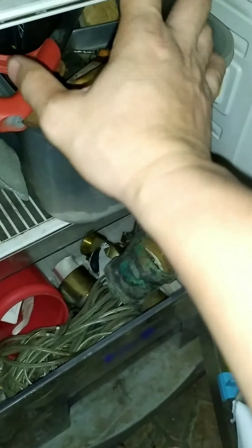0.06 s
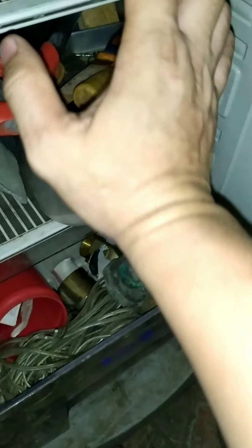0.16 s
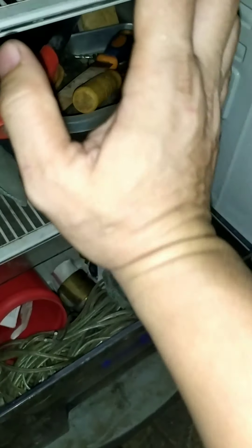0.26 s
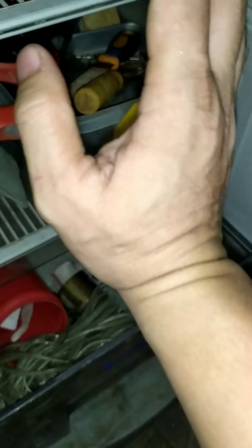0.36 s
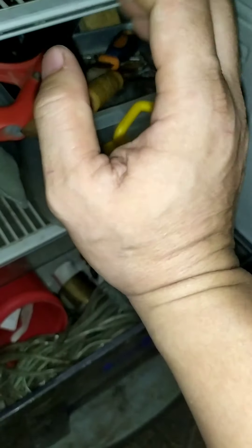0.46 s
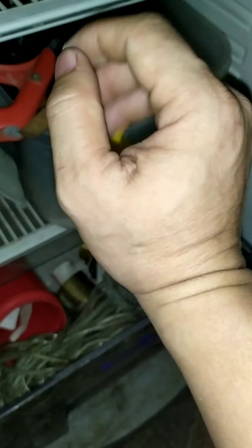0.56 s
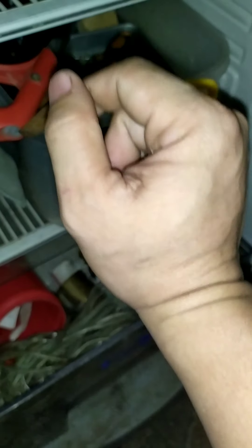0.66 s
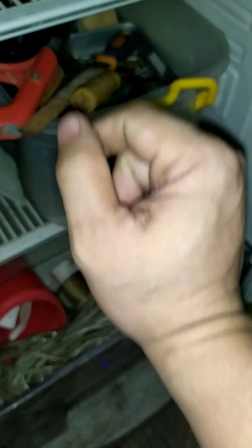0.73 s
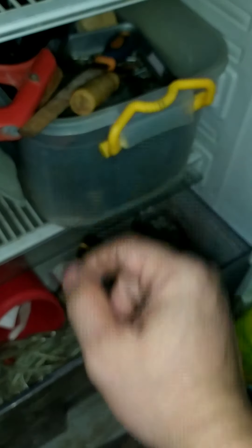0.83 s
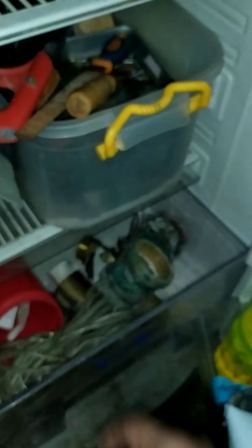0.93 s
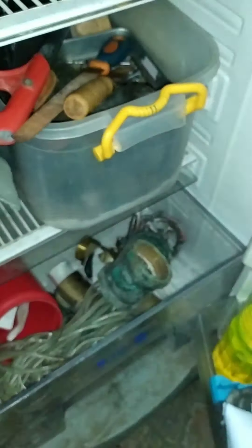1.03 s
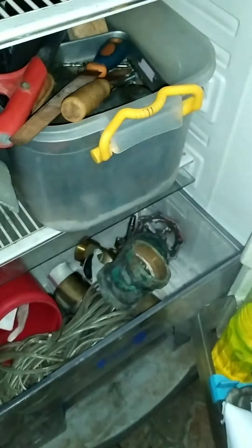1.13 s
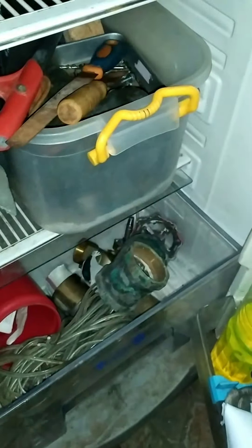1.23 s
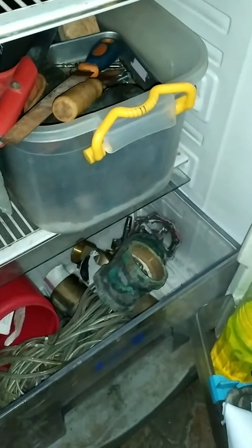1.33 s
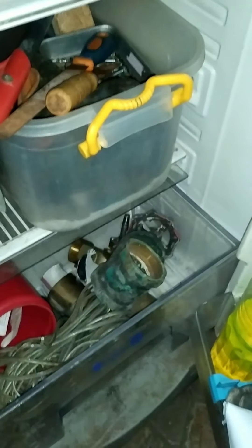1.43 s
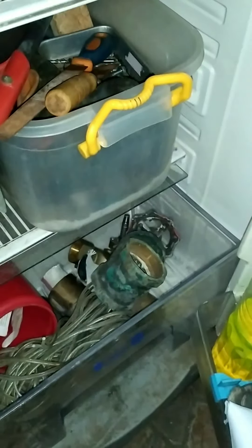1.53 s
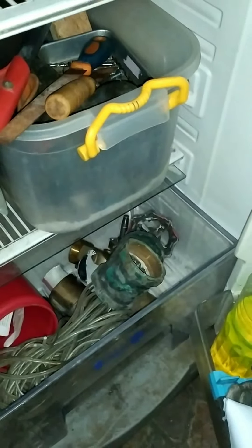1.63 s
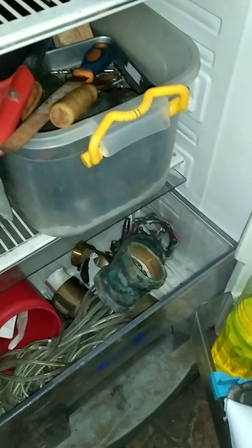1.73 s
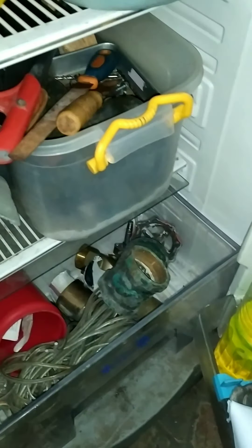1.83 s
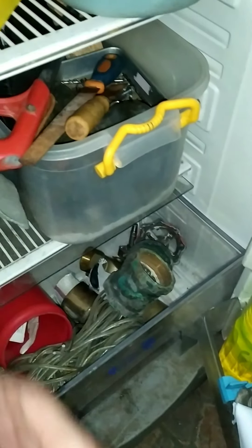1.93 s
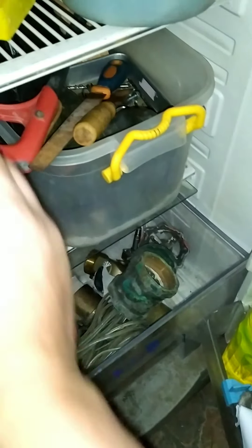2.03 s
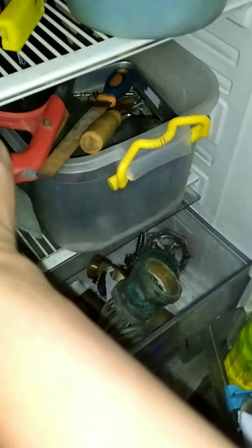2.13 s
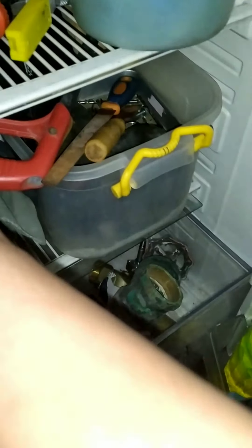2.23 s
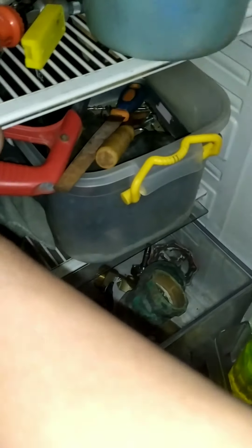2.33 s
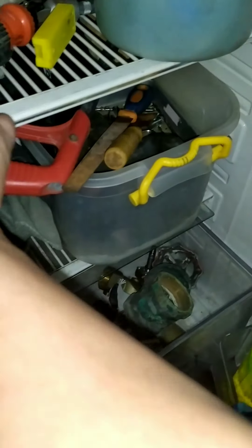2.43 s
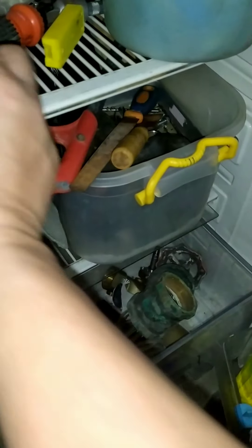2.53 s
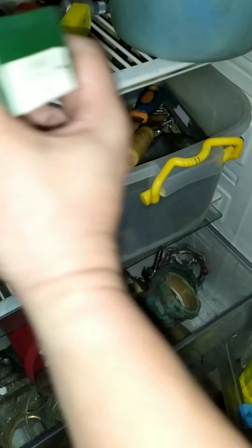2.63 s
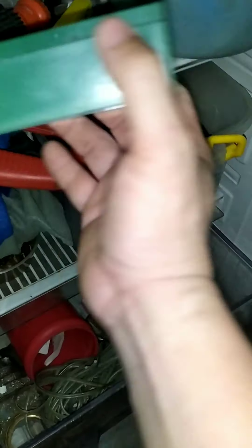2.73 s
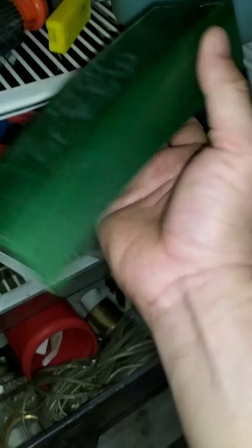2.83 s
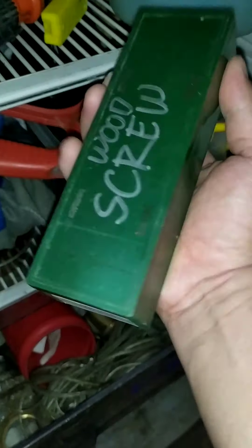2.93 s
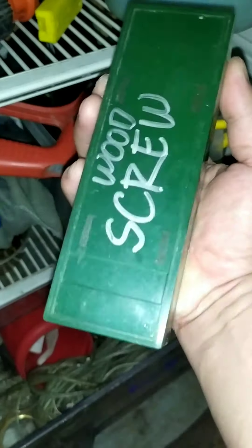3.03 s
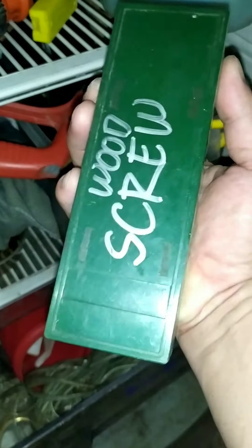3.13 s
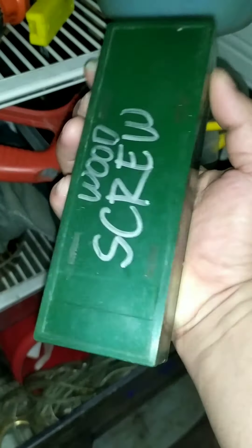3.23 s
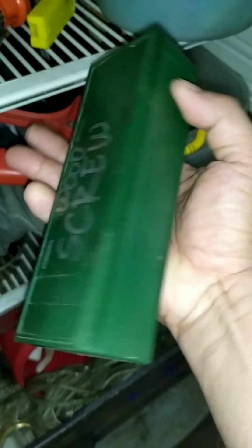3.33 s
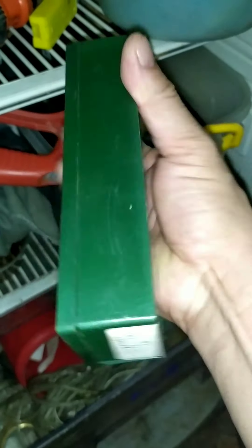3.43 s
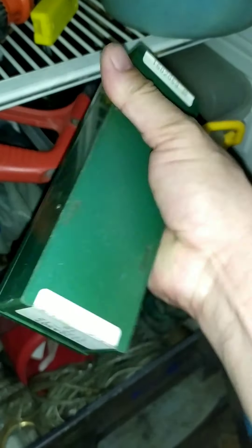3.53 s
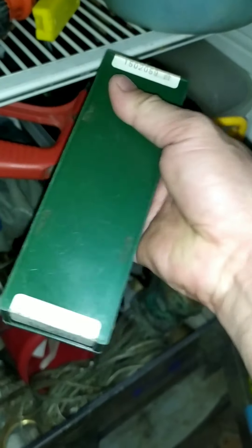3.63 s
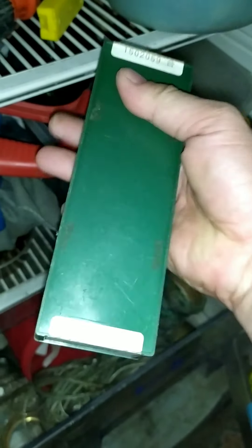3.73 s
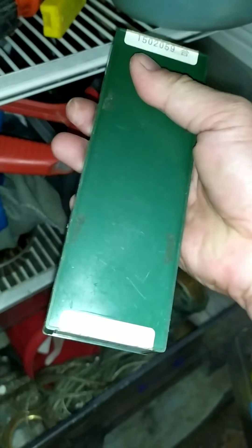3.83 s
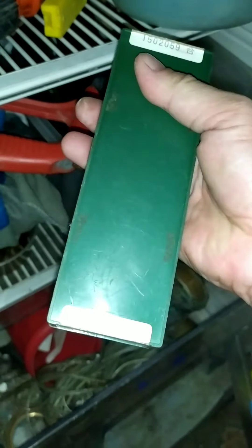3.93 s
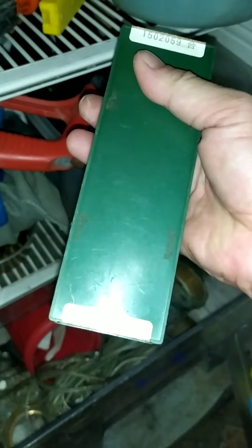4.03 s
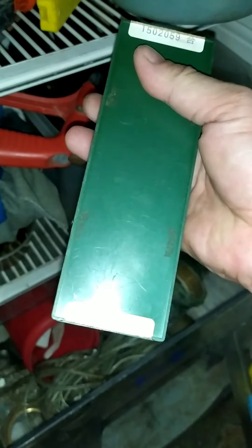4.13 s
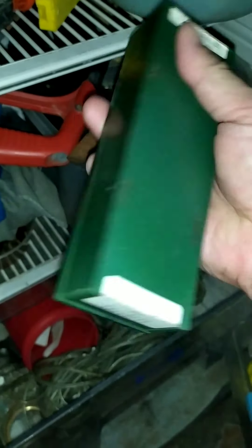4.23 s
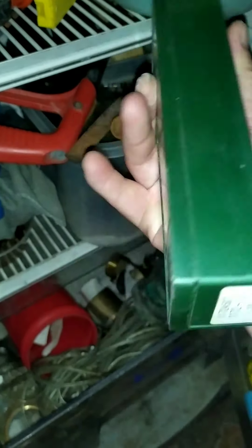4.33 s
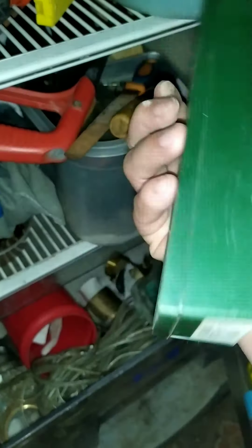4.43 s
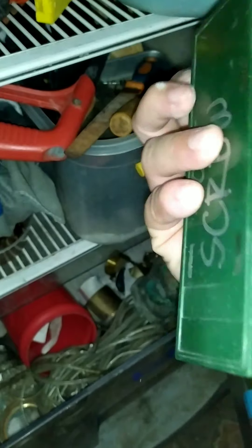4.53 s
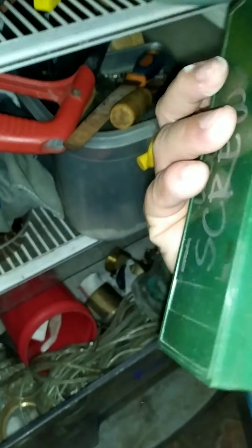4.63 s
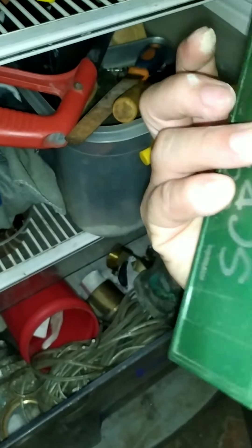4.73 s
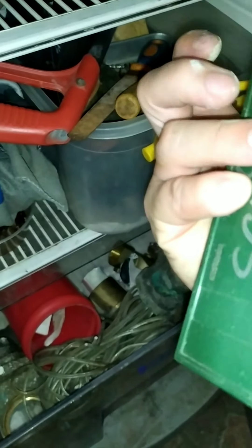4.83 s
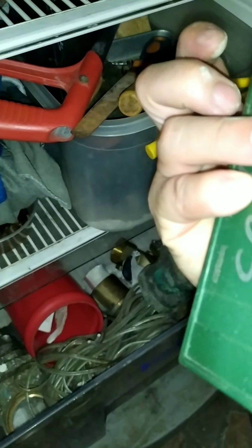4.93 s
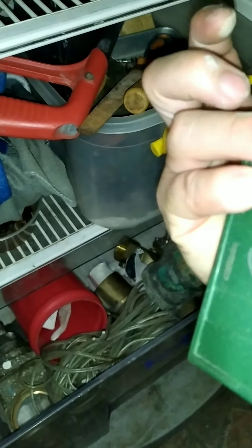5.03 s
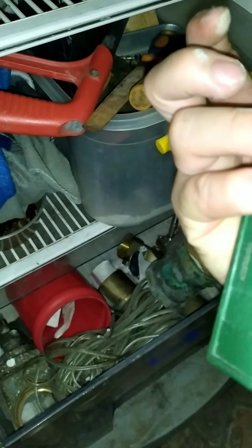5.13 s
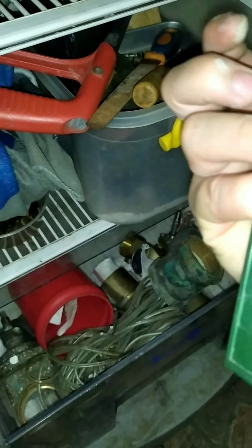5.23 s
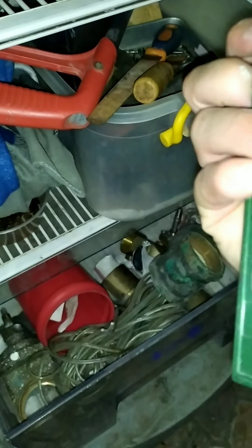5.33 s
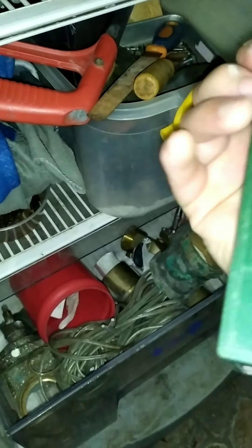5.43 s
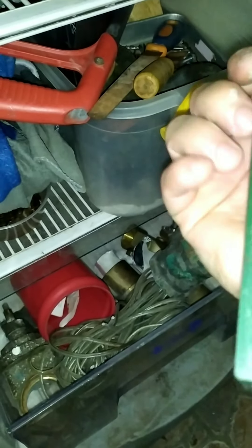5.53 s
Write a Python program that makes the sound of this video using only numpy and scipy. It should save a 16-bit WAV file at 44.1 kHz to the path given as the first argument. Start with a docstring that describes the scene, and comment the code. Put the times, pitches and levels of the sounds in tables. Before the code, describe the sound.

A cricket chirps over faint night rumble as a tool clatters in a tub and a box of screws is lifted, tipped and shaken.

```python
"""A tool knocks about in a plastic tub with loose metal bits, and stirs again faintly after a second;
a hand then drags a long plastic box of screws off a wire shelf and tips it, so screws slide and clack.
A cricket chirps outside over a low night rumble throughout. Knocks, box and shelf ring decaying modes;
slides are random collisions, chirps are falling tones and the night is shaped noise."""
import sys
import numpy as np
from scipy import signal
from scipy.io import wavfile
from scipy.ndimage import uniform_filter1d

SR = 44100
rng = np.random.default_rng(int(sys.argv[2]) if len(sys.argv) > 2 else 0)


def int16_out(signal):
    """Quantize to a 16-bit WAV file."""
    q = np.round(np.clip(np.atleast_2d(signal).T, -1, 1) * 32767)
    wavfile.write(sys.argv[1], SR, q.astype(np.int16))


N = 246078

# Night spectrum: (frequency [Hz], relative density [dB per Hz])
NIGHT_SPECTRUM = [(15, -31), (25, -8), (102, 1), (161, -13.5), (343, -12), (1040, -22.5), (1400, -26),
                  (5840, -32.5), (6680, -28.5), (7650, -9), (8300, -25.5), (9500, -65), (10900, -37),
                  (14600, -32.5), (15900, -44.5)]
# Night stereo: (frequency [Hz], left-right correlation [-1..1])
NIGHT_CORRELATION = [(60, 0.94), (240, 0.93), (950, 0.087), (3770, 0.068), (15000, 0.13)]
# Last and loudest wing stroke of each chirp: time [s]
CHIRP_TIMES_S = [0.0452, 0.383, 0.485, 0.5853, 0.6834, 0.778, 0.877, 0.975, 1.074, 1.1734, 1.269, 1.381,
                 1.4826, 1.5908, 1.6923, 1.7918, 1.8882, 1.9846, 2.0815, 2.1768, 2.2795, 2.379, 2.4723,
                 2.571, 3.1543, 3.2488, 3.348, 3.936, 4.029, 4.1233, 4.2227, 4.32, 5.001, 5.0975, 5.1948,
                 5.2965, 5.3916]
# Chirp loudness, before stroke levels: (time [s], level [dB])
CHIRP_LEVELS = [(0, -42.5), (.85, -42.5), (1.5, -40), (2.2, -39.5), (2.3, -45), (3.3, -43.5), (4.3, -45),
                (5.1, -41), (5.3, -40.5), (5.4, -46)]
# Wing strokes of one chirp: (time from the last stroke [s], level re chirp [dB])
WING_STROKES = [(-.030, -24.5), (-.016, 4), (0, 7.5)]
# Wire rack: (mode [Hz], level [dB], t60 [s])
SHELF_MODES = [(116, -1, 0.17), (126, -11.5, 0.15), (330, -8.5, 0.032), (515, -3.5, 0.046),
               (593, -10, 0.058)]
# The box jolts along the rack, then leaves it: (time [s], hum level [dB], rod clank re hum [dB])
SHELF_JOLTS = [(2.331, -46, -13), (2.39, -38, -18.5), (2.465, -36.5, -15), (2.481, -34, -30),
               (2.562, -34, -21), (2.597, -37.5, -1), (2.7, -43, -4), (2.742, -32, 14.5),
               (2.751, -18.5, -3), (2.797, -27.5, -14), (2.856, -40, -1)]
# Plastic tub: (nominal mode [Hz], mean level [dB], t60 [s])
TUB_MODES = [(114, -4.5, 0.16), (257.6, 5, 0.11), (186, -3, 0.058), (386, -2.5, 0.02), (612.4, -3.5, 0.057),
             (1449, -10.5, 0.015), (2725, -8, .02), (3620, -1.5, 0.013), (3870, -4, 0.02),
             (3960, 1.5, .024), (4710, -7, .018), (6274, -7, 0.03)]
# Tool on tub, before layer trims: (time [s], level [dB], treble re level [dB], thump re level [dB])
TUB_KNOCKS = [(0.087, -3, -10, -11), (0.1272, -10.5, -13.5, -2), (0.1746, -6.5, -10.5, -13.5),
              (0.2257, -13, -5.5, -12), (0.2399, -17, -3, -11.5), (0.2902, -25, -6.5, -24),
              (0.421, -43.5, -9.5, -21), (1.274, -50.5, -25, 5), (1.2896, -57, -3, -6),
              (1.3114, -59, 11, -9)]
# Loose metal slides as one heap (bits in the tub until 1.4 s, then the screws), before trims:
# (start [s], build-up [s], level [dB], slide [s], sag [dB], treble re level [dB], box boom re level [dB])
HEAP_SLIDES = [(0.082, 0.0033, -23, 0.06, -16, -3, -4), (0.2, 0.039, -30, 0.055, -11, 0, -14.5),
               (1.268, .006, -48, 0.092, -20, -1.5, -6), (2.459, 0.081, -42.5, 0.18, 4.5, -6.5, -12),
               (2.78, 0.02, -45, .15, 0.5, -13.5, -11), (2.736, 0.011, -28, 0.035, -18.5, -6.5, -7),
               (2.951, 0.013, -21.5, .025, -3.5, -6.5, -15), (2.991, .012, -21.5, 0.037, -4, -10, -18),
               (3.06, 0.009, -38.5, 0.064, 0.5, -15, -15.5), (3.351, 0.03, -38, 0.19, 5.5, -16, -14),
               (3.472, 0.015, -14, .05, -3.5, -3.5, -9), (3.535, .01, -14.5, .08, -8, -8.5, -20.5),
               (3.624, 0.0097, -17, .19, -17, -5, -12.5), (3.819, 0.014, -33, .14, -28, -13.5, -16),
               (4.352, 0.042, -22, 0.11, -3.5, -10, -14), (4.52, 0.01, -21, 0.18, -9, -9.5, -19.5),
               (4.69, 0.034, -18, 0.042, -10.5, -7.5, -13.5), (4.8, .02, -47, 0.11, -8.5, -9, -19.5),
               (5.36, 0.027, -63, 0.082, 6, -3.5, -6), (5.477, 0.0047, -37.5, 0.053, -3.5, -25, -13.5),
               (5.558, 0.026, -23, .01, -1, -13, -7)]
# Single clacks of screws on the box wall, before trims: (time [s], level [dB], ping [Hz])
SCREW_CLACKS = [(2.382, -41.5, 1850), (2.4024, -38, 2170), (2.6338, -24, 1730), (2.651, -22, 1750),
                (2.705, -26.5, 2500), (2.7433, -15, 2740), (2.825, -30, 1910), (2.8544, -17, 3870),
                (2.8843, -23.5, 4040), (2.9285, -26.5, 2480), (2.9656, -3.5, 4420), (2.9734, -6, 4190),
                (3.0189, -10.5, 2160), (3.0524, -13.5, 2000), (3.2162, -33.5, 3740), (3.239, -40, 2080),
                (3.381, -29, 2020), (3.4118, -17.5, 1980), (3.49, -5, 2220), (3.5125, -8.5, 1250),
                (3.5426, -5.5, 4740), (3.5514, -2.5, 1420), (3.5633, -1.5, 1575), (3.6315, -7, 5540),
                (3.6431, -7.5, 2430), (3.7053, -9, 2420), (3.722, -8.5, 2470), (3.7436, -13, 2460),
                (3.7644, -11.5, 2360), (3.7766, -15, 2740), (3.803, -18, 2740), (3.816, -16.5, 2700),
                (3.967, -37.5, 2480), (4.334, -33, 2790), (4.369, -16.5, 2220), (4.425, -5, 2060),
                (4.4392, -4.5, 4080), (4.467, -8.5, 2090), (4.4844, -7.5, 1960), (4.5236, -6.5, 4820),
                (4.538, -8.5, 1550), (4.5584, -7.5, 4470), (4.5724, -11.5, 4580), (4.6325, -11, 2130),
                (4.6986, -5.5, 4270), (4.7722, -16.5, 1840), (4.838, -24, 2100), (4.8484, -21, 2480),
                (4.8698, -27, 2600), (4.8859, -14.5, 2790), (5.3682, -39.5, 1960), (5.4156, -34, 2200),
                (5.4753, -27, 2420), (5.4847, -15, 1910), (5.5204, -21, 2140), (5.5754, -12, 1940)]
# Tones of a clack: (multiple of its ping [ratio], level [dB])
CLACK_TONES = [(.68, -7.5), (1, 1), (1.43, -6), (2.1, -11)]
# Colour of a screw on the box wall: (frequency [Hz], relative density [dB per Hz])
BOX_COLOUR = [(88, -51.5), (150, -19.5), (259, -11), (465, -11), (599, -5.5), (1010, -11), (1500, -8),
              (1680, -10), (2170, -4.5), (3200, -7.5), (4380, -5.5), (9370, -20), (15900, -36.5)]
# Box stereo: (frequency [Hz], left minus right [dB])
BOX_BALANCE = [(60, -6), (180, 1.5), (550, -7.5), (1650, 2), (4970, 2.5), (15000, -7.5)]

NIGHT_RMS_DB = -52.5
SLIDE_START_DB, SETTLE_DB_PER_S = -21.5, 500  # level at start re full build-up; fall rate after the slide
HITS_PER_S, HARD_DB = 980, -38  # collision rate, held down to heap level HARD_DB
THINNING = 0.2  # dB of rate lost per dB of level below HARD_DB
CLACK_BOOM_DB, BOOM_PER_DB = -23.5, 1.2  # boom of a 0 dB clack before the wall; growth per dB of clack
CLACK_TREBLE_DB, TREBLE_PER_DB = -10.5, 1.57  # same for treble
EDGE_HZ = 15800
CONTROL_STEP = 32  # samples


def gain_of(db):
    """Decibels to amplitude gain."""
    return 10 ** (np.asarray(db) / 20)


def evened(x):
    """Scales to rms 1."""
    return x / np.sqrt(np.mean(x ** 2) + 1e-20)


def read(points, hz):
    """Interpolates a spectrum table on a log-frequency axis."""
    f, value = np.transpose(points)
    return np.interp(np.log(hz + 1), np.log(f + 1), value)


def add(mix, start_s, sound):
    """Mixes a sound in place at start_s, cut at the end of the mix."""
    part = mix[..., round(start_s * SR):][..., :sound.shape[-1]]
    part += sound[..., :part.shape[-1]]


def band(x, lo_hz, hi_hz):
    """Causal Butterworth band-pass."""
    return signal.sosfilt(signal.butter(3, [lo_hz, hi_hz], "band", fs=SR, output="sos"), x)


def colour(x, db):
    """Minimum-phase filter from a gain in dB given at 2049 frequencies."""
    log_gain = np.log(gain_of(np.r_[db, db[-2:0:-1]]))
    taps = np.fft.ifft(np.exp(np.conj(signal.hilbert(log_gain)))).real
    return signal.oaconvolve(x, taps[:2048])[:len(x)]


def ring(modes):
    """Impulse response: a sum of exponentially decaying modes."""
    t = np.arange(SR // 4) / SR
    return sum(gain_of(db - 60 * t / t60_s) * np.sin(2 * np.pi * hz * t) for hz, db, t60_s in modes)


def ping(hz, t60_s):
    """One decaying mode, reaching the two microphones with unrelated phase and strength."""
    t = np.arange(1600) / SR
    phase, side = rng.random((2, 2, 1))
    decay = gain_of(9.5 * (side - .5) - 60 * t / t60_s)
    return decay * np.sin(2 * np.pi * (hz * t + phase)) * (1 - np.exp(-t / 0.00018))


def snap(t60_s, rise_s):
    """Decaying noise of a contact: an independent stereo pair for crack, one common signal for bass."""
    t = np.arange(1600) / SR
    envelope = gain_of(-60 * t / t60_s) * (1 - np.exp(-t / rise_s))
    both, left, right = rng.standard_normal((3, len(t))) * envelope
    return np.array([left, right]), both


def cupboard(x, t60_s, wet_db):
    """Short dense echoes between close walls, as decaying noise after a 3 ms gap."""
    t = np.arange(SR // 5) / SR
    tail = rng.standard_normal((2, len(t))) * gain_of(-60 * t / t60_s) * (t > .003)
    tail /= np.linalg.norm(tail[0])
    return x + gain_of(wet_db) * signal.oaconvolve(x, tail, axes=1)[:, :N]


def night():
    """Low outdoor rumble and microphone hiss: shaped noise with slowly drifting patches."""
    frames, hz = N // 256 + 5, np.fft.rfftfreq(1024, 1 / SR)
    a, b, c, d, patches = rng.standard_normal((frames, 513, 5)).T
    patches = evened(uniform_filter1d(uniform_filter1d(patches, 12, 0), 14, 1))
    same = np.clip(read(NIGHT_CORRELATION, hz), -1, 1)[:, None]
    left = a + 1j * b
    right = same * left + np.sqrt(1 - same ** 2) * (c + 1j * d)
    spectra = np.array([left, right]) * gain_of(read(NIGHT_SPECTRUM, hz)[:, None] + 2.6 * patches)
    noise = signal.istft(spectra, nperseg=1024, noverlap=768)[1][:, :N]
    return gain_of(NIGHT_RMS_DB) * evened(noise)


def wing_stroke():
    """A short tone sliding down from about 8 kHz, roughened by uneven file teeth."""
    t = np.arange(500) / SR
    hz = (8000 - 75000 * t) * (1 + 0.004 * rng.standard_normal())
    file = uniform_filter1d(uniform_filter1d(rng.standard_normal((2, len(t))), 50), 50)
    teeth = 1 + 0.83 * evened(file)
    shape = (t / 0.0037) ** 2.84 * np.exp(2.2 - 2.26 * t / 0.0029) * signal.windows.tukey(len(t), .3)
    turns = np.cumsum(hz) / SR + rng.random() + np.array([[0], [.2]])  # phase offset, right channel
    return shape * teeth * np.sin(2 * np.pi * turns)


def cricket():
    """Wing strokes grouped into chirps; walls outside smear them."""
    out = np.zeros((2, N))
    levels_db = np.interp(CHIRP_TIMES_S, *np.transpose(CHIRP_LEVELS))
    levels_db = levels_db + 1.1 * rng.standard_normal(len(CHIRP_TIMES_S))
    for last_s, db in zip(CHIRP_TIMES_S, levels_db):
        for offset_s, stroke_db in WING_STROKES:
            add(out, last_s + offset_s - .001, gain_of(db + stroke_db + 3) * wing_stroke())
    return cupboard(band(out, 4300, 8400), t60_s=0.094, wet_db=-2.5)


def shelf():
    """Each jolt rings the wire rack: a low hum of the whole grid and a clank of single rods."""
    hum = ring([m for m in SHELF_MODES if m[0] < 200])
    clank = ring([m for m in SHELF_MODES if m[0] >= 200])
    out = np.zeros(N)
    for s, hum_db, clank_db in SHELF_JOLTS:
        add(out, s, gain_of(hum_db) * (hum + gain_of(clank_db) * clank))
    return band(out, 110, 970) * gain_of([[-.8], [.8]])


def tub():
    """Each blow lands elsewhere: brief chatter rings the modes unevenly, with a bright crack on top."""
    out = np.zeros((2, N))
    for s, db, treble_db, thump_db in TUB_KNOCKS:
        modes = [(hz * rng.uniform(.97, 1.03), mode_db + 1.5 * rng.standard_normal(), t60_s)
                 for hz, mode_db, t60_s in TUB_MODES]
        low = ring([m for m in modes if m[0] < 1000])
        high = ring([m for m in modes if m[0] >= 1000])
        apart = snap(t60_s=0.032, rise_s=0.00063)[0]
        push = snap(t60_s=0.039, rise_s=0.00083)[1]  # the walls flex longer than the contact lasts
        chatter = signal.oaconvolve(apart, high[None], axes=1)
        chatter /= abs(chatter).max()
        thump = signal.oaconvolve(push, low)
        thump /= abs(thump).max()
        add(out, s, gain_of(db + 2.0) * chatter + gain_of(db + thump_db + 3.5) * thump)
        crack = gain_of(db - 3.5) * band(apart, 900, 7500)
        treble = gain_of(db + treble_db + 9.5) * band(apart, 7000, 18000)
        add(out, s, crack + treble)
    return cupboard(band(out, 85, 18000), t60_s=.11, wet_db=-10)


def sliding():
    """Heap level, treble and boom in dB: each slide builds up, changes by its sag, then settles."""
    start_s, rise_s, db, length_s, sag_db, treble_db, boom_db = np.transpose(HEAP_SLIDES)[:, :, None]
    knots = np.arange(0, N, CONTROL_STEP)
    u = knots / SR - start_s - rise_s  # s since full build-up
    build_db = -SLIDE_START_DB * np.minimum(u / rise_s, 0)
    settle_db = -SETTLE_DB_PER_S * np.maximum(u - length_s, 0)
    shape_db = build_db + sag_db * np.clip(u / length_s, 0, 1) + settle_db
    gate = np.where(u > -2 * rise_s, 1, 1e-9)
    power = gain_of(2 * np.maximum(db + shape_db, -150)) * gate + 1e-20
    share = power / power.sum(0)  # the louder slide sets treble and boom
    curves = 10 * np.log10(power.sum(0)), (share * treble_db).sum(0), (share * boom_db).sum(0)
    return [np.interp(np.arange(N), knots, c) for c in curves]


def collisions(level_db):
    """Random small hits of 32 kinds, each ringing its own few modes of screw and wall."""
    thin_db = THINNING * np.clip(level_db - HARD_DB, -40, 0)  # a slow heap makes fewer, separate ticks
    hit = rng.random(N) < HITS_PER_S * gain_of(2 * thin_db) / SR
    size = gain_of(3.23 * np.minimum(rng.exponential(1, N), 4) - thin_db) * hit
    kind, clatter, boom = rng.integers(0, 32, N), np.zeros((2, N)), np.zeros(N)
    for k in range(32):
        apart, both = snap(t60_s=.014 * rng.uniform(0.49, 2.6), rise_s=0.000094)
        modes_hz = np.exp(rng.uniform(np.log(1200), np.log(13000), 5))
        rings = sum(ping(hz, t60_s=.03) for hz in modes_hz)
        hits = size * (kind == k)
        clatter += signal.oaconvolve(hits[None], apart + gain_of(-6.5) * rings, axes=1)[:, :N]
        boom += signal.oaconvolve(hits, both)[:N]
    return evened(clatter), evened(boom)


def box_wall(layer, lo_hz, hi_hz):
    """Colours a stereo layer by the box wall, normalised to the power of its band."""
    hz = np.fft.rfftfreq(4096, 1 / SR)
    wall_db, balance_db = read(BOX_COLOUR, hz), read(BOX_BALANCE, hz)
    inside = (hz > lo_hz) & (hz < hi_hz)
    wall_db = wall_db - 10 * np.log10(np.sum(gain_of(2 * wall_db)[inside]) / len(hz))
    sides = [colour(v, wall_db + side * balance_db / 2) for v, side in zip(layer, (1, -1))]
    return gain_of(1.5) * band(np.array(sides), lo_hz, hi_hz)


def screws():
    """Heap collisions and clack noise pass through the box wall; the clacks' pings bypass it."""
    level_db, treble_db, boom_db = sliding()
    clatter, boom = collisions(level_db)
    clatter *= gain_of(level_db - 4.0)
    boom *= gain_of(level_db + boom_db)
    bright = clatter * gain_of(treble_db)
    pings = np.zeros((2, N))
    for s, db, hz in SCREW_CLACKS:
        apart, both = snap(t60_s=0.025, rise_s=0.00017)
        add(clatter, s, gain_of(1.134 * db - 6.0) * apart)  # soft clacks are more ping than crack
        add(bright, s, gain_of(CLACK_TREBLE_DB + TREBLE_PER_DB * db) * apart)
        add(boom, s, gain_of(CLACK_BOOM_DB + BOOM_PER_DB * db) * both)
        tones = [gain_of(db - 6.0 + tone_db) * ping(hz * k, t60_s=.017) for k, tone_db in CLACK_TONES]
        add(pings, s, sum(tones))
    out = pings + box_wall(clatter, 1250, 6840) + box_wall(bright, 8750, 22000)
    out += box_wall(np.array([boom, boom]), 220, 1410)
    return cupboard(out, t60_s=0.085, wet_db=-8.5)


def scene():
    """All sources at the two microphones."""
    return night() + cricket() + shelf() + tub() + screws()


def record(dry):
    """Band-pass of the microphones, soft overload, then a steep low-pass."""
    soft = 1.068 * np.tanh(band(dry, 45, 19000) / 1.04)
    low_pass = signal.firwin(401, EDGE_HZ, window=("kaiser", 9), fs=SR)
    return signal.oaconvolve(soft, low_pass[None], "same")


dry = scene()
out = record(dry)
int16_out(out)
```